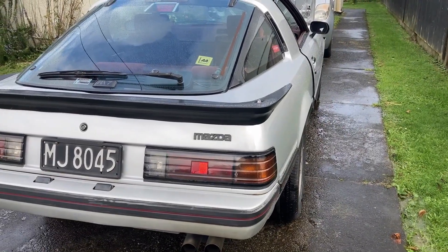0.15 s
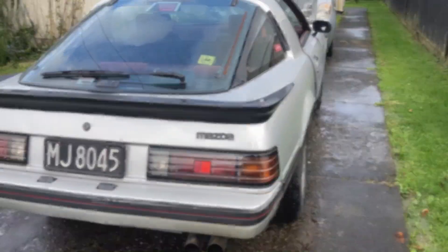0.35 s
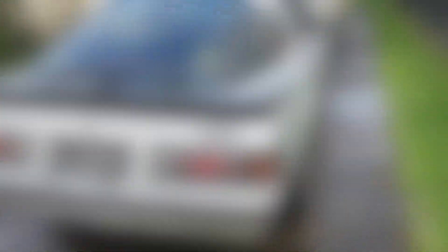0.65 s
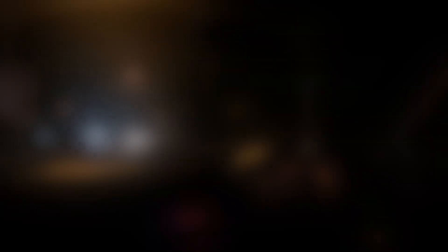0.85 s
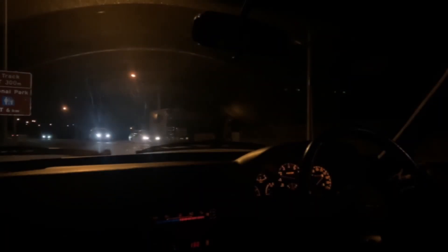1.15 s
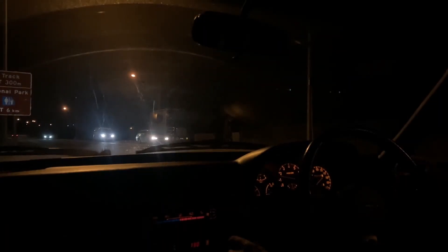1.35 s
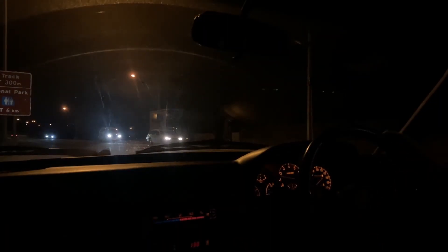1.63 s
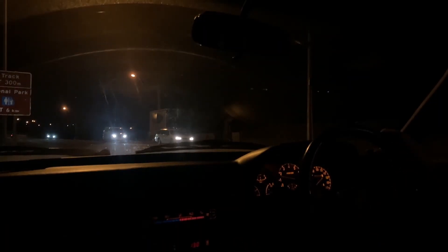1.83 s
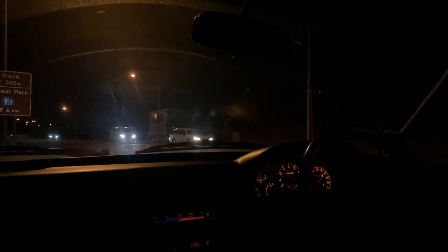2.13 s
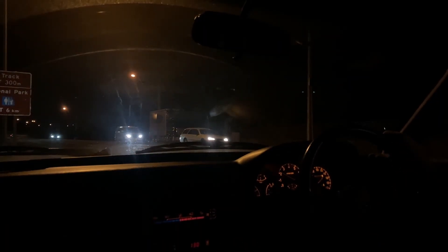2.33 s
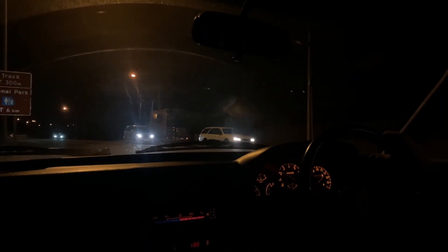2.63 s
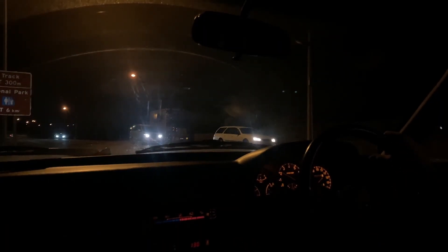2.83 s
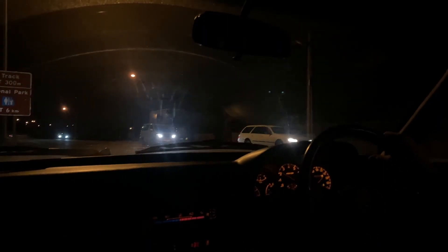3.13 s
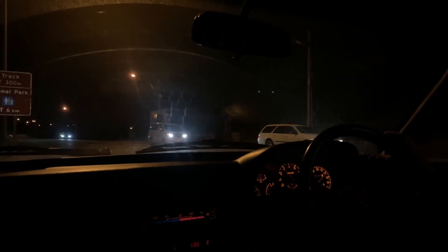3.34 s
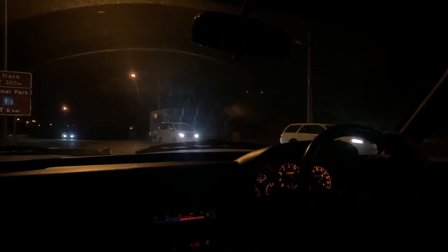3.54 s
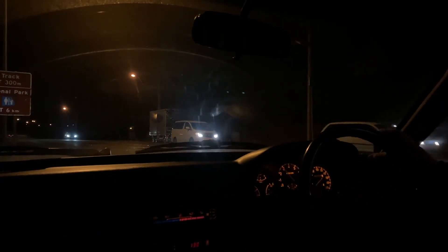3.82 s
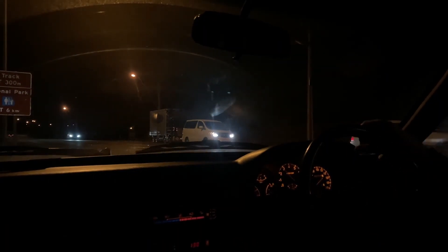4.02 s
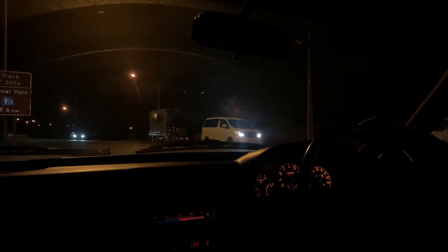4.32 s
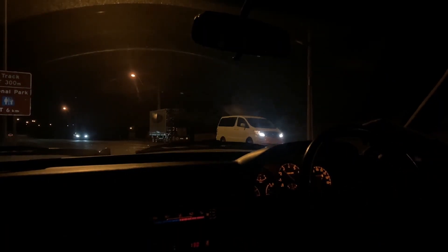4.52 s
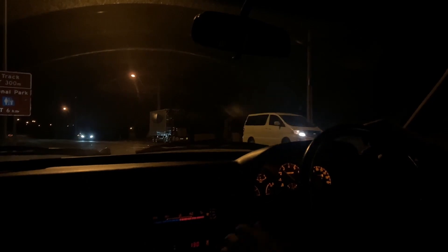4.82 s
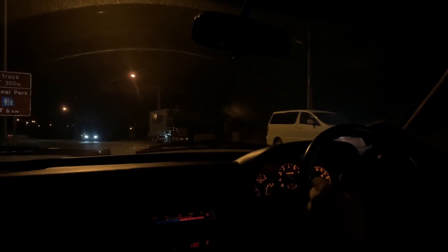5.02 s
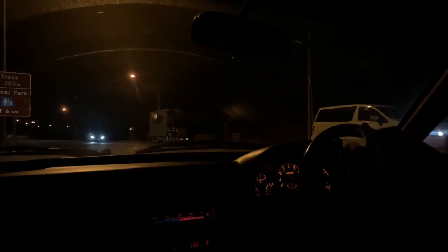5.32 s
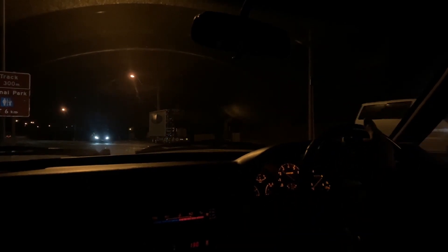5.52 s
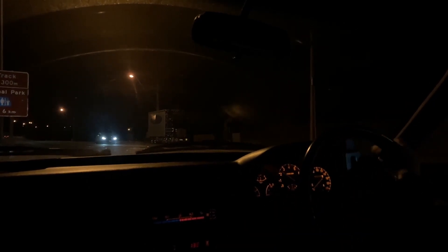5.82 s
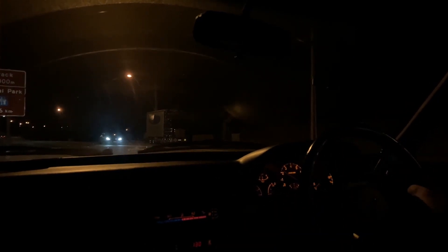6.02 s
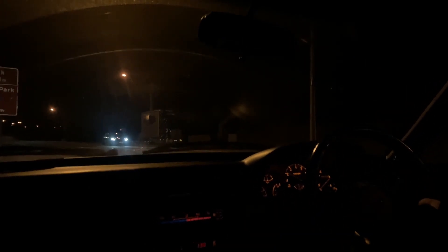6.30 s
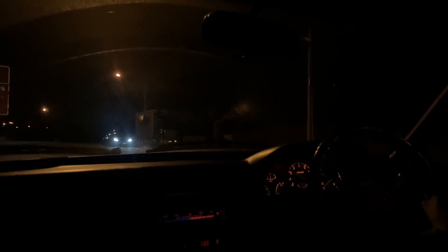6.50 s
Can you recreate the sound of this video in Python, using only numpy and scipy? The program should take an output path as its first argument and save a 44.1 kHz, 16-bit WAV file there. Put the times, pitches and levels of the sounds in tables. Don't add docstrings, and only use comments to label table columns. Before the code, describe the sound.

A phone picks up a lumpy exhaust idle at the pipe, strong catches alternating with stumbles and hissy puffs. Suddenly we are inside the car, the engine bassy and dulled by trim. An indicator relay ticks regularly while levers snap and pedals knock; one short rev, then a higher one falling away, uneven stumbling, and a gentle pull-away under light throttle.

```python
import sys
import numpy as np
from scipy import signal
from scipy.fft import rfft, irfft, next_fast_len
from scipy.io import wavfile
from scipy.ndimage import uniform_filter1d

SR = 44100
rng = np.random.default_rng(int(sys.argv[2]) if len(sys.argv) > 2 else 0)


def generate_wav(sig):
    pcm = np.round(np.clip(np.atleast_2d(sig).T, -1, 1) * 32767).astype(np.int16)
    wavfile.write(sys.argv[1], SR, pcm)


def convert_level_to_amplitude(level_db):
    exponent = np.asarray(level_db, float) / 20
    return 10 ** exponent


N = 293706
CUT_S = .76

# pitch_hz, width_hz, level_db
PIPE_MODES = [(124, 78, -10.5), (174.8, 27.7, 0.5), (200.7, 22, 0.5), (224, 25, -4), (281, 24, -13),
              (350.6, 30, -23), (393.5, 21, -18.5), (509.5, 35, -23), (604, 46, -21), (910, 440, -26.5)]
# pitch_hz, width_hz, level_db
SHELL_MODES = [(111, 21, -8.5), (158.9, 41, -10.5), (199.4, 25.5, 4.5), (258.6, 26, -12), (369, 60, -15),
               (542, 81, -17), (590.4, 12, -12), (739, 89, -20.5)]
# pitch_hz, level_db (per Hz)
JET_COLOUR = [(100, -11.5), (400, -5), (1000, -14), (2500, -28), (5000, -18), (7000, -11), (9000, -7.5),
              (11000, -2), (13000, -9), (15700, -13), (16100, -59.5)]
# pitch_hz, level_db (per Hz)
BUZZ_COLOUR = [(1000, -22), (3000, -6), (5000, -5.5), (7000, -6.5), (9000, -0.5), (11000, -1), (13000, -4),
               (15700, -3.5), (16100, -46.5)]
# pitch_hz, level_db (per Hz)
RUMBLE_COLOUR = [(12, -41.5), (20, -18.5), (53, -2), (78, 3.5), (99, -5), (145, -17.5), (212, -10.5),
                 (265, -18), (326, -23.5), (456, -28.5), (593, -26), (652, -29), (933, -37.5), (2420, -54),
                 (6000, -63.5), (7800, -101), (13200, -120)]
# pitch_hz, level_db (per Hz)
YARD_COLOUR = [(150, -10), (400, 1), (1000, -3), (2500, -10), (5000, -10), (6500, -18), (9000, -43.5)]
RUMBLE_DB, YARD_DB = -25.5, -39

# time_s, speed_turns_per_s
IDLE_SPEED = [(0.0, 28.6), (0.126, 27.6), (0.196, 28.6), (0.306, 27.1), (0.382, 27.5), (0.45, 28.3),
              (0.562, 26.5), (0.684, 28.5), (0.752, 28.3)]
# start_s, length_s, bark_boost_db
SURGES = [
    (-0.06, 0.07, 4),
    (0.166, 0.075, 7),
    (0.406, 0.055, 8),
    (0.555, 0.005, 1),
    (0.66, 0.09, 7),
]
SURGE_RISE_S, SURGE_FALL_S, PIPE_BARK_DB = .045, .03, -20
# stumbling_db, catching_db
LOPE_ORDERS = [(-27, -46), (-31, -12), (-21, -32)]
# order, level_db
HALF_ORDERS = [(1.5, -24), (2.5, -22)]
HALF_DB = -1.5
# start_s, length_s, level_db
JETS = [
    (-0.02, 0.025, -25),
    (0.084, 0.172, -29),
    (0.27, 0.1, -33),
    (0.374, 0.128, -28),
    (0.592, 0.004, -24),
    (0.628, 0.108, -26),
]
JET_RISE_S, JET_FALL_S = .012, .07

# time_s, speed_turns_per_s
CABIN_SPEED = [(0.76, 26.3), (1.79, 25.2), (1.89, 30.2), (2.04, 38.7), (2.09, 39), (2.22, 36.5),
               (2.91, 31.8), (3.11, 40), (3.22, 48.1), (3.29, 50), (3.53, 48.8), (4.29, 40), (4.75, 41.5),
               (5.06, 38.6), (5.34, 40.1), (6.15, 32.6), (6.3, 33.7), (6.66, 35.2)]
# time_s, level_db
LOAD = [(0.76, -32), (1.78, -30), (1.84, -15.5), (1.98, -11.5), (2.06, -16), (2.09, -32), (2.92, -30),
        (3.06, -13), (3.23, -13.5), (3.28, -20), (3.53, -36), (4.54, -34), (4.6, -20.5), (4.75, -21.5),
        (4.95, -36), (5.06, -20), (5.34, -16), (6.66, -14.5)]
FULL_LOAD_DB = -12
# time_s, firing_db, rocking_db (once a turn), bark_db
LURCHES = [(1.53, -31, -50, -28), (1.72, -29, -40, -28), (1.94, -30, -40, -24.5), (2.04, -30, -40, -24.5),
           (2.22, -22, -50, -38), (2.35, -17.5, -33, -37), (2.45, -18, -34, -45), (2.53, -24, -23, -40),
           (2.78, -21.5, -25.5, -38), (2.9, -22.5, -20, -35), (3.14, -20, -38, -22), (3.23, -20, -30, -26),
           (3.31, -19, -30, -22), (3.5, -40, -23.5, -22), (3.6, -30, -21, -44), (3.71, -43, -21.5, -24),
           (3.89, -36, -18.5, -38), (4.13, -30, -18.5, -33), (4.2, -22, -24, -30), (4.31, -21, -21.5, -27),
           (4.42, -36, -19.5, -29), (4.56, -30, -26, -26), (4.8, -27, -17.5, -31), (4.88, -24, -20, -32),
           (4.97, -40, -19, -33), (5.06, -25, -19, -34), (5.31, -25, -24, -27), (5.74, -25, -20, -40),
           (6.15, -25, -24, -28), (6.3, -25, -24, -31), (6.58, -25, -24, -40)]
LURCH_S = .12
# pitch_hz, level_db
MOUNTS_ORDER_1 = [(25, -48), (37, -38), (42, -27), (50, -30)]
# pitch_hz, level_db
CABIN_ORDER_4 = [(100, -22), (120, -19), (138, -35), (160, -30), (182, -40), (199, -18)]
# pitch_hz, level_db
CABIN_ORDER_5 = [(150, -46), (180, -38), (197, -25), (240, -36)]
DRONE_SHARE, SHELL_SHARE, BUZZ_SHARE, RUMBLE_SHARE = .55, .3, .4, .1
SHELL_BARK_DB, BUZZ_FULL_DB, BUZZ_DB_PER_TURN = -32, -59.5, .1
CLUTCH_S, CLUTCH_LENGTH_S, CLUTCH_FADE_S, CLUTCH_ROCK_DB, CLUTCH_LOAD_DB = 4.85, .72, .25, -22, -9
# order, level_db, share_db_per_db (of load)
UPPER_ORDERS = [(3, -6, .3), (6, -1, .15), (7, -10, .5), (8, 0, .5), (10, 5, .3), (12, 8, .55),
                (14, -3, .2), (15, -4, .4), (16, -5, .5), (18, 3, .8)]
# pitch_hz, level_db
CABIN_AIR = [(100, -36), (160, -38), (205, -30), (235, -36), (262, -31), (288, -46), (345, -56), (375, -50),
             (395, -62), (540, -62), (570, -50), (593, -37), (625, -52), (900, -70)]
UPPER_WOBBLE_DB = 3.5

# pitch_hz, width_hz, level_db, until_s
BOOMS = [
    (40, 5.4, -34.5, 3.05),
    (67.3, 3.9, -30, 1.7),
    (80.04, 4, -33.5, 1.8),
]
# pitch_hz, width_hz, level_db
DASH_MODES = [(275, 70, 2.5), (594, 30, 0), (720, 380, -4.5)]
DASH_DB, DASH_SHARE, DASH_DB_PER_TURN, DASH_TURNS = -35, .5, .9, 48
# start_s, length_s, from_hz, to_hz, level_db
WHINE = [
    (2.55, .8, 1545, 1450, -63),
    (3.95, .27, 1940, 1850, -64),
    (4.66, .36, 1900, 1780, -67),
    (5.7, .9, 2160, 2165, -71),
]
WHINE_FADE_S = .14

# start_s, peak_db, middle_db, knock_db, ring_hz
CLICKS = [(0.9554, -52, -51.5, -41.5, 1740), (1.2028, -35, -48, -54, 3780), (1.2198, -21, -40, -30, 1370),
          (1.2337, -18.5, -21, -17.5, 1480), (1.502, -56, -60, -31, 1300), (1.5125, -52, -54, -28, 1500),
          (1.5202, -48, -63.5, -28, 1320), (1.5955, -45, -50, -42.5, 3010),
          (1.6606, -40, -48.5, -35.5, 2500), (1.7669, -50.5, -54.5, -39.5, 1360),
          (2.1298, -26.5, -48.5, -32.5, 1350), (2.2998, -52.5, -55, -49.5, 1310),
          (2.5678, -34, -47.5, -42.5, 1300), (3.5554, -54, -58, -40.5, 1370),
          (3.6524, -50, -58.5, -37, 1700), (3.6588, -52, -53, -38, 1770), (3.6907, -24, -43.5, -28, 4040),
          (3.7044, -32.5, -37, -33, 2120), (3.7953, -47, -59.5, -39.5, 1520), (4.2507, -45, -50, -54, 1480),
          (4.3375, -42, -47, -33, 3500), (4.351, -50, -51, -38, 3000), (4.418, -52, -55, -50, 3300),
          (4.432, -39.5, -49, -46, 1420), (4.444, -36, -46, -42, 1900), (4.4495, -25, -42, -30.5, 2230),
          (4.8337, -53.5, -47.5, -44.5, 1450), (5.5644, -34, -42, -50, 2600), (5.5662, -11, -27, -30, 2450),
          (5.5785, -34, -40, -45, 2450), (6.2474, -47.5, -53, -47.5, 1650)]
CLICK_T60_S, SOFT_T60_PER_DB = .045, .0006
# start_s, level_db, pitch_hz, t60_s
THUDS = [
    (2.3, -22.5, 190, 0.092),
    (3, -21.5, 120, .1),
    (1.3, -31, 180, 0.12),
    (1.52, -21, 530, 0.047),
    (1.237, -22, 780, 0.077),
    (4.342, -23, 470, .07),
    (4.452, -35, 510, .07),
    (5.03, -32, 320, .08),
    (3.7, -28, 560, .08),
    (3.69, -24, 200, .1),
]
# start_s, level_db, pitch_hz, t60_s
RINGS = [
    (5.5662, -22, 9900, .05),
    (5.5665, -33, 1345, .05),
    (5.5665, -33, 5350, .04),
    (4.4525, -33, 7000, .06),
    (4.459, -36, 2250, .06),
    (3.686, -33, 11200, .07),
    (1.5965, -44, 7000, .07),
]
# start_s, peak_db, ring_db (above the peak)
TICKS = [(1.6267, -33.5, -11.5), (2.2278, -34.5, -10.5), (2.832, -33.5, -10), (3.4376, -34.5, -9),
         (4.0377, -34.5, -9), (4.6364, -36, -12.5), (5.236, -36, -10.5), (5.8306, -34, -15),
         (6.4263, -36, -13.5)]
# start_s, peak_db
TOCKS = [(1.8742, -27.5), (2.4783, -28), (3.0786, -27), (3.68, -25.5), (4.2868, -27), (4.8868, -28.5),
         (5.4865, -28.5), (6.0801, -28)]
# pitch_hz, level_db, t60_s
TICK_RING = [(716.8, 7, .07), (2140, -11.5, 0.04), (3041.6, -12.5, .03), (3720, 1, 0.035), (4073, 8, 0.042),
             (4550, -9, 0.035), (6800, -9.5, 0.039)]
# pitch_hz, level_db, t60_s
TOCK_RING = [(1997, -1.5, 0.063), (3014, -9, 0.048), (4030, 0.5, 0.053), (7250, -4.5, 0.045),
             (10930, 10.5, 0.032)]

# pitch_hz, likeness (0 to 1)
PORT_LIKENESS = [(30, .97), (80, .93), (180, .97), (350, .72), (700, .86), (1300, .5), (2400, .35),
                 (5000, .45), (6500, .93), (16000, .88)]
# pitch_hz, level_db
LEFT_DB = [(60, 0), (150, 0), (300, 1.5), (700, 1.3), (1400, 3), (3000, 2.2), (6500, 0), (15000, 0)]
# pitch_hz, lag_cycles
PORT_LAG = [(2500, 0), (7000, 1), (9050, 1.5), (11400, 2), (13750, 2.5), (15800, 3)]


def evened(x):
    return x / np.sqrt(np.mean(x ** 2) + 1e-20)


def read(points, hz):
    f, value = np.transpose(points)
    return np.interp(np.log(hz + 1), np.log(f + 1), value)


def follow(curve, t):
    return np.interp(t, *np.transpose(curve))


def spell(t, start, length, rise_s, fall_s):
    return -np.maximum(start - t, 0) / rise_s - np.maximum(t - start - length, 0) / fall_s


def add(mix, s, sound):
    part = mix[:, round(s * SR):][:, :sound.shape[1]]
    part += sound[:, :part.shape[1]]


def tone(cycles):
    phase = 2 * np.pi * cycles
    return np.array([np.sin(phase), np.sin(phase - np.pi / 2)])


def soft_ends(n):
    return signal.windows.tukey(n, 180 / n)


def resonate(x, hz, width):
    return signal.lfilter(*signal.iirpeak(hz, hz / width, SR), x)


def drift(n, hz):
    count = int(n / SR * hz * 2) + 4
    return np.interp(np.linspace(1, count - 2, n), np.arange(count), rng.standard_normal(count)) * 0.95


def noise(n, colour, patchy_db):
    a, b, patches = rng.standard_normal((3, 2, 513, n // 256 + 5))
    patches = uniform_filter1d(patches[0], size=14, axis=0)
    patches = evened(uniform_filter1d(patches, size=8, axis=1))
    spectrum = (a + 1j * b) * convert_level_to_amplitude(patchy_db * patches)
    white = signal.istft(spectrum, nperseg=1024, noverlap=768)[1][:, :n]
    return evened(irfft(rfft(white) * convert_level_to_amplitude(read(colour, np.fft.rfftfreq(n, 1 / SR))), n))


def band(n, lo_hz, hi_hz):
    sos = signal.butter(2, [lo_hz, hi_hz], "band", fs=SR, output="sos")
    return evened(signal.sosfilt(sos, rng.standard_normal((2, n))))


def engine(t, speed, orders, order_db, body, bark_db, hiss_db, colour, start_turn, weak, loaded_db,
           uneven_db, rough, wobble_db, gate, patchy_db):
    n = len(t)
    turns = start_turn + np.cumsum(speed) / SR
    tones = sum(convert_level_to_amplitude(db + wobble_db * drift(n, 6.4)) * tone(k * turns + k / (2 * np.pi))
                for k, db in zip(orders, order_db))

    slack = np.clip((loaded_db - np.maximum(*order_db[:2])) / 10, .08, 1)
    firing = np.floor(2 * turns).astype(int)
    strength = convert_level_to_amplitude(uneven_db * slack * rng.standard_normal(size=600)[firing])
    strength = strength * np.where(firing % 2, weak, 1)
    pulses = evened(strength * np.diff(firing, prepend=firing[0]))
    puffs = strength * np.exp(-(2 * turns % 1) / 1.05)
    companion = signal.hilbert(pulses, next_fast_len(n))[:n].imag
    turbulence = evened(puffs * rng.standard_normal((2, n)))
    drive = np.array([pulses, companion]) + rough * slack * turbulence

    bark = sum((-1) ** k * convert_level_to_amplitude(db) * evened(resonate(resonate(drive, hz, width), hz, 2 * width))
               for k, (hz, width, db) in enumerate(body))
    bark = bark / np.sqrt(uniform_filter1d(bark[0] ** 2, size=5000) + 1e-9)
    hiss = noise(n, colour, patchy_db) * evened(1 + gate * puffs)
    mix = np.sqrt(2) * tones + convert_level_to_amplitude(bark_db) * bark + convert_level_to_amplitude(hiss_db) * hiss
    return mix * soft_ends(n)


def idle_times():
    return np.arange(round((CUT_S - .006) * SR)) / SR


def surge_shapes(t):
    return [np.clip(1 + spell(t, s, length, SURGE_RISE_S, SURGE_FALL_S), 0, 1) for s, length, _ in SURGES]


def tailpipe():
    t = idle_times()
    surges = surge_shapes(t)
    caught = np.max(surges, axis=0)
    boost_db = np.max([row[2] * surge for row, surge in zip(SURGES, surges)], axis=0)
    jet_db = np.max([db + 20 * spell(t, s, length, JET_RISE_S, JET_FALL_S) for s, length, db in JETS], axis=0)
    order_db = [stumbling + (catching - stumbling) * caught for stumbling, catching in LOPE_ORDERS]
    yard = convert_level_to_amplitude(YARD_DB) * noise(len(t), YARD_COLOUR, 1.5) * soft_ends(len(t))
    return yard + engine(
        t, follow(IDLE_SPEED, t), orders=(1, 2, 3), order_db=order_db, body=PIPE_MODES,
        bark_db=PIPE_BARK_DB + boost_db, hiss_db=jet_db, colour=JET_COLOUR, start_turn=.95, weak=0.37,
        loaded_db=-9.5, uneven_db=2.5, rough=.55, wobble_db=.7, gate=0.47, patchy_db=2.0)


def skips():
    t = idle_times()
    caught = np.max(surge_shapes(t), axis=0)
    turns = np.cumsum(follow(IDLE_SPEED, t)) / SR
    tones = sum(convert_level_to_amplitude(db + HALF_DB + 2.5 * drift(len(t), 9)) * tone(k * turns + rng.random() / (2 * np.pi))
                for k, db in HALF_ORDERS)
    return tones * (1 - caught) * soft_ends(len(t))


def cabin_times():
    return np.arange(round(CUT_S * SR), N + 90) / SR


def cabin():
    t = cabin_times()
    slow = t[::64]
    speed, load_db = follow(CABIN_SPEED, slow), follow(LOAD, slow)
    drag_db = 20 * spell(slow, CLUTCH_S, CLUTCH_LENGTH_S, CLUTCH_FADE_S, CLUTCH_FADE_S)
    lift_db = load_db - FULL_LOAD_DB
    strain_db = np.maximum(load_db, CLUTCH_LOAD_DB + drag_db) - FULL_LOAD_DB
    lurches = [np.array(row)[:, None] + 20 * spell(slow, s, 0, LURCH_S, LURCH_S) for s, *row in LURCHES]
    fire_db, rock_db, knock_db = np.max(lurches, axis=0)

    bark_db = np.maximum(SHELL_BARK_DB + SHELL_SHARE * lift_db, knock_db)
    hiss_db = BUZZ_FULL_DB + BUZZ_SHARE * lift_db + BUZZ_DB_PER_TURN * (speed - speed.mean())
    order_1_db = np.max([read(MOUNTS_ORDER_1, speed), rock_db, CLUTCH_ROCK_DB + drag_db], axis=0)
    order_2_db = np.maximum(load_db, fire_db)
    order_4_db = read(CABIN_ORDER_4, speed * 4) + DRONE_SHARE * lift_db
    order_5_db = read(CABIN_ORDER_5, speed * 5) + DRONE_SHARE * strain_db
    controls = [speed, bark_db, hiss_db, order_1_db, order_2_db, order_4_db, order_5_db]
    speed, bark_db, hiss_db, *order_db = (np.interp(t, slow, c) for c in controls)
    return engine(
        t, speed, orders=(1, 2, 4, 5), order_db=order_db, body=SHELL_MODES, bark_db=bark_db,
        hiss_db=hiss_db, colour=BUZZ_COLOUR, start_turn=0.3037, weak=0.19, loaded_db=-17.5,
        uneven_db=5, rough=.55, wobble_db=.9, gate=.15, patchy_db=2.0)


def upper_orders():
    t = cabin_times()
    slow = t[::64]
    speed, lift_db = follow(CABIN_SPEED, slow), follow(LOAD, slow) - FULL_LOAD_DB
    turns = np.cumsum(follow(CABIN_SPEED, t)) / SR
    mix = np.zeros((2, len(t)))
    for k, db, share in UPPER_ORDERS:
        wobble_db = UPPER_WOBBLE_DB * drift(len(slow), SR / 100)
        level_db = db + read(CABIN_AIR, k * speed) + share * lift_db + wobble_db
        mix += np.interp(t, slow, convert_level_to_amplitude(level_db)) * tone(k * turns + rng.random() / (2 * np.pi))
    return mix


def panels(t):
    shake = rng.standard_normal((2, len(t)))

    def drum(hz, width, db):
        return convert_level_to_amplitude(db) * evened(resonate(resonate(shake, hz, width), hz, width))

    booms = sum(drum(hz, width, db) * np.clip((until - t) / 0.079, .15, 1) for hz, width, db, until in BOOMS)
    dash_db = DASH_DB + DASH_SHARE * (follow(LOAD, t) - FULL_LOAD_DB)
    dash_db = dash_db + DASH_DB_PER_TURN * (follow(CABIN_SPEED, t) - DASH_TURNS)
    return booms + convert_level_to_amplitude(dash_db) * sum(drum(*mode) for mode in DASH_MODES)


def gear_whine(t):
    waver_hz, waver_db = 20 * drift(len(t), 30), 5.5 * drift(len(t), 12)
    mix = np.zeros((2, len(t)))
    for s, length, from_hz, to_hz, db in WHINE:
        cycles = np.cumsum(np.interp(t, [s, s + length], [from_hz, to_hz]) + waver_hz) / SR
        fade_db = 20 * spell(t, s, length, WHINE_FADE_S, WHINE_FADE_S)
        mix += convert_level_to_amplitude(db + waver_db + fade_db) * tone(cycles)
    return mix


def rumble():
    t = np.arange(CUT_S, N / SR + .01, 1 / SR)
    level_db = RUMBLE_DB + RUMBLE_SHARE * (follow(LOAD, t) - FULL_LOAD_DB)
    mix = convert_level_to_amplitude(level_db) * noise(len(t), RUMBLE_COLOUR, 2.3) + panels(t) + gear_whine(t)
    return t[0] - .004, mix * np.minimum((t - t[0]) / .004, 1)


def click(db, mid_db, knock_db, ring_hz, t60):
    t = np.arange(4000) / SR
    ragged = convert_level_to_amplitude(2.0 * drift(len(t), 250) - 60 * t / t60) * np.minimum(t / 0.002, 1)
    broad = band(len(t), 1100, 5100)
    middle = 0.7 * broad + 0.9 * evened(resonate(broad, ring_hz, 260))
    snap = convert_level_to_amplitude(db - 6) * noise(len(t), BUZZ_COLOUR, 4.0) + convert_level_to_amplitude(mid_db - 1.0) * middle
    knock = convert_level_to_amplitude(knock_db - 3 - 45 * t / t60) * band(len(t), 300, 880) * np.minimum(t / 0.0052, 1)
    return snap * ragged + knock


def thud(db, hz, t60):
    t = np.arange(8000) / SR
    return convert_level_to_amplitude(db - 60 * t / t60) * np.minimum(t / 0.0026, 1) * tone(hz * t)


def relay(db, ring, ring_db, t60, bounce_s):
    t = np.arange(4000) / SR
    crack = noise(len(t), BUZZ_COLOUR, 0.84) * convert_level_to_amplitude(-60 * t / t60)
    modes = sum(convert_level_to_amplitude(mode_db - 60 * t / mode_t60) * tone(hz * t + rng.random())
                for hz, mode_db, mode_t60 in ring)
    hit = (crack + convert_level_to_amplitude(ring_db) * modes) * np.minimum(t / 0.0022, 1)
    return convert_level_to_amplitude(db) * (hit + 0.56 * np.roll(hit, round(bounce_s * SR), axis=1))


def scene():
    mix = np.zeros((2, N))
    add(mix, 0, tailpipe())
    add(mix, 0, skips())
    add(mix, CUT_S, cabin())
    add(mix, CUT_S, upper_orders())
    add(mix, *rumble())
    for s, *row in CLICKS:
        add(mix, s, click(*row, t60=CLICK_T60_S - SOFT_T60_PER_DB * (row[0] + 10)))
    for s, *row in THUDS + RINGS:
        add(mix, s, thud(*row))
    for s, db, ring_db in TICKS:
        add(mix, s, relay(db - 6, TICK_RING, ring_db + 9, 0.034, 0.005))
    for s, db in TOCKS:
        add(mix, s, relay(db - 5, TOCK_RING, -9.5, 0.045, 0.0058))
    return mix


def band_limit(x):
    return signal.sosfilt(signal.butter(12, 16900, fs=SR, output="sos"), x)


def record(dry):
    hz = np.fft.rfftfreq(N, 1 / SR)
    main, other = rfft(dry)
    same, tilt = np.clip(read(PORT_LIKENESS, hz), 0, 1), convert_level_to_amplitude(read(LEFT_DB, hz) / 2)
    lag = 2 * np.pi * np.interp(hz, *np.transpose(PORT_LAG))
    left = main * tilt
    right = (same * main * np.exp(1j * lag) + np.sqrt(1 - same ** 2) * other) / tilt

    kept = np.array([np.clip((abs(part(lag / 2)) - hz / 45000) / .2 + (hz < 6200), .04, 1)
                     for part in (np.cos, np.sin)])
    whole = np.array([left + right, left - right]) / 2
    thinned, lost = irfft(kept * whole, N), irfft((1 - kept) * whole, N)

    treble = irfft(main * (hz > 6200), N) ** 2
    sudden = uniform_filter1d(treble, size=150) / (abs(uniform_filter1d(treble, size=3000)) + 1e-12)
    mid, side = thinned + lost * np.clip((sudden - 3.5) / 2, 0, 1)
    ports = np.array([mid + side, mid - side])
    limited = ports / (1 + abs(ports / .95) ** 4) ** .25
    return band_limit(limited)


dry = scene()
out = record(dry)
generate_wav(out)
```